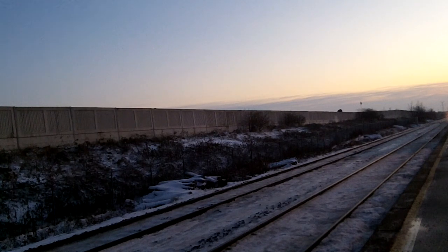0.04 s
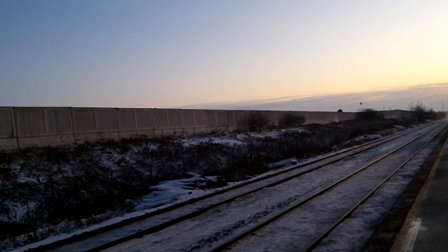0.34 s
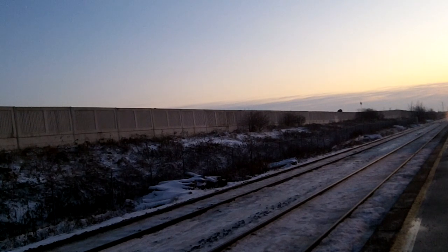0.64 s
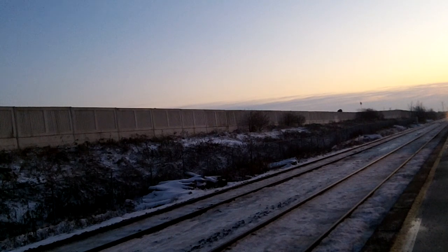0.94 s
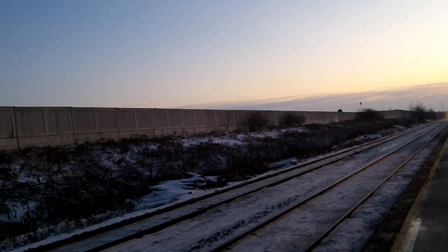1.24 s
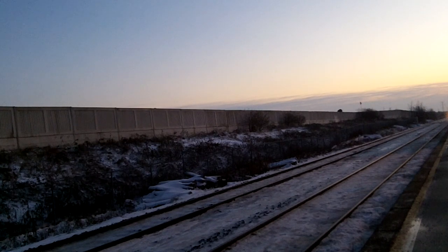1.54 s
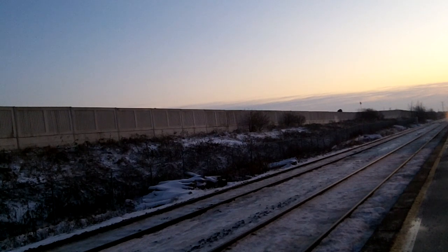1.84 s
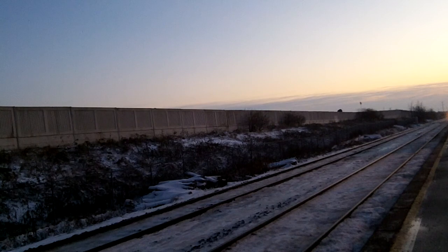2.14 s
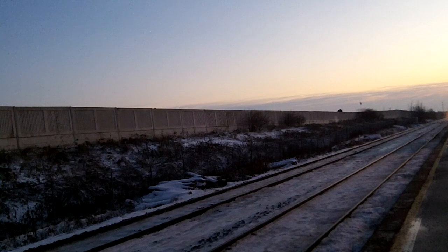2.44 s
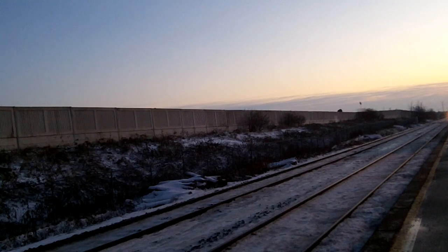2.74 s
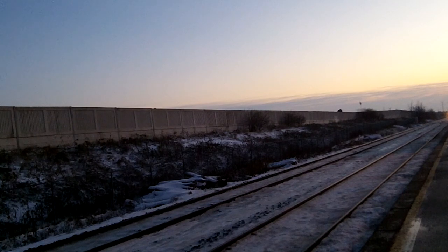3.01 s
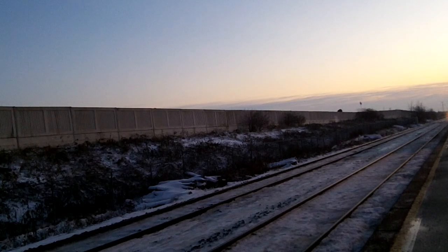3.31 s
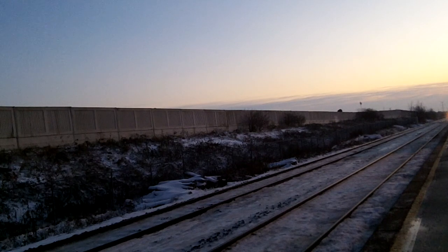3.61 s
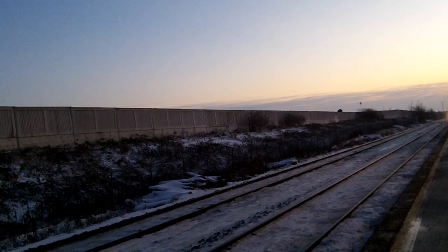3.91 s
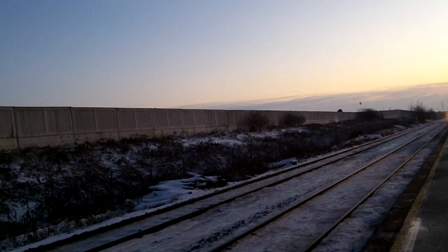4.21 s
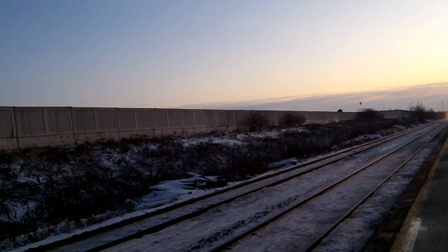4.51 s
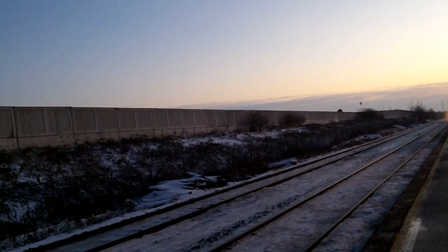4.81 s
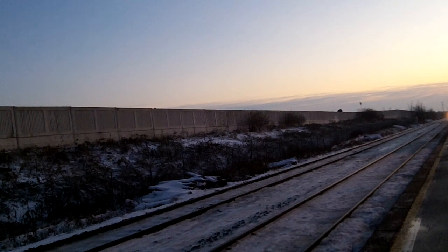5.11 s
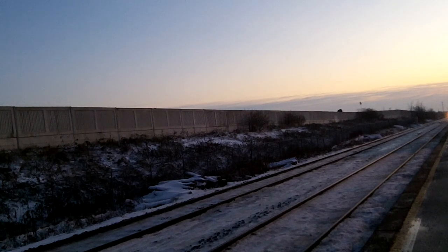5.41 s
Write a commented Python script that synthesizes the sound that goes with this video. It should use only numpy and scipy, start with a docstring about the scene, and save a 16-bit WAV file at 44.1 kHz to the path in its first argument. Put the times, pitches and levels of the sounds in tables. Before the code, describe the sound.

Heard from a station platform, a distant freight train rolls closer behind two hard-working diesel engines. It opens with short metallic scrapes and a fuzzy ringing of wheels on rails, over a low, pulsing drone and an even roar. Soft whines come and go, the deep rumble swells a few times in the second half, and the wheel ringing returns at the close. The overall level stays much the same, with faint microphone hiss underneath.

```python
"""Two diesel locomotives, still far off, haul a freight train under load towards a station platform.
From the start their exhaust pulses beat: at almost equal speeds they drift in and out of step.
In the first second flanges scrape, and wheels and rails sing over the roar of the rolling train.
From about three seconds the deep rumble swells now and then; at the end the wheels sing out again.
Machinery hums and the microphone hisses faintly throughout."""
import sys
import numpy as np
from scipy import signal
from scipy.fft import rfft, irfft
from scipy.io import wavfile
from scipy.ndimage import uniform_filter1d

SR = 44100
rng = np.random.default_rng(int(sys.argv[2]) if len(sys.argv) > 2 else 0)


def put_to_file(sound):
    """Save the sound as 16-bit audio at rate SR, in the file named by the first command-line argument."""
    columns = np.atleast_2d(sound).T  # one column per channel
    safe = np.clip(columns, -1, 1)
    whole_steps = np.round(safe * 32767)
    wavfile.write(sys.argv[1], SR, whole_steps.astype(np.int16))


N = 245195
TIME = np.arange(N) / SR
FROM_MIDDLE_S = TIME - TIME.mean()

# speed of the lead engine: time_s, pulse_rate_hz
LEAD_PULSE_RATE = [(0, 16.065), (5.56, 16.068)]


def engine(speed, first_pulse_s, resonances, growth, chug, scatter, uneven=.09):
    """Periodic pulses form harmonics that ring the silencer; higher ones waver more in the air."""
    rate_hz, = follow(speed, TIME)
    cycles = np.cumsum(rate_hz) / SR - first_pulse_s * rate_hz[0]
    exhaust = np.zeros(N)
    for order in range(3, 14):
        hz = order * rate_hz.mean()
        silencer = sum(amp(db) / (1 + 1j * (hz * hz - peak_hz * peak_hz) / (hz * width_hz)) ** 2
                       for peak_hz, width_hz, db in resonances)
        air = 1 + scatter * order / 14 * waver(2.8)
        nearing = amp(read(growth, hz) * FROM_MIDDLE_S)
        exhaust += np.sqrt(2) * nearing * (silencer * air * np.exp(2j * np.pi * order * cycles)).real
    return exhaust * (1 + uneven * waver(3.5).real) * (1 + chug * np.cos(2 * np.pi * cycles))


def locomotives():
    """Beats: the harmonics of two engines at almost one speed reinforce and cancel in turn."""
    # speed of the rear engine: time_s, pulse_rate_hz
    rear_pulse_rate = [(0, 15.938), (2.8, 15.939), (4.2, 15.965), (5.56, 15.924)]
    # exhaust resonances: pitch_hz, width_hz, level_db
    lead_modes = [(76.5, 7.1, -36.2), (107.5, 10.7, -24.5), (119.4, 11.3, -24.7), (160.4, 3, -40.8),
                  (187.7, 39.6, -49.4), (213.5, 3.5, -30.4)]
    rear_modes = [(96.7, 3, -40.9), (108, 39.8, -41.3), (143.9, 3, -48.9), (161.8, 3, -42.3)]
    # the lead sharpens as it nears; the rear, screened by it, hardly changes: pitch_hz, gain_db_per_s
    lead_growth = [(80, -1), (96, .7), (112, -.3), (128, .6), (145, 2.3), (160, 1.3), (190, .8), (209, 1.4)]
    rear_growth = [(96, -.2), (112, .6)]
    # the lead exhaust as the air carries it: time_s, gain_db, chug_depth
    lead_throb = [(0, .3, .1), (.3, -1.3, .1), (.8, -1.3, 0), (1.25, 1, .1), (1.55, .2, .05), (2.2, -.6, 0),
                  (2.75, -.5, .15), (3.05, 1.3, .2), (3.35, -.3, .05), (3.6, .7, .36), (4.15, .4, .36),
                  (4.52, -.3, .25), (4.68, 1.6, .25), (4.84, -2.2, .05), (4.97, 0, .1), (5.22, .6, .22),
                  (5.38, -1.5, .15), (5.56, -1, .05)]
    fading_db, chug = follow(lead_throb, TIME)
    lead = engine(LEAD_PULSE_RATE, .0561, lead_modes, lead_growth, chug, scatter=.13)
    rear = engine(rear_pulse_rate, .0011, rear_modes, rear_growth, chug=0, scatter=.1)
    return amp(fading_db) * lead + rear


def machinery(approach_db_per_s=1, whine_width_hz=14):
    """Rotation makes spectral lines: engine hums, broadened by echoes, and whines that swell."""
    # lead engine overtones: pulse_rate_multiple, width_hz, steady_share, level_db
    overtones = [(4.04, 4.6, 0.44, -56.5), (15.02, 5.7, 0.28, -57), (18.09, 1.1, 0.3, -56),
                 (19.91, 33, 0.04, -53.5), (24.87, 8.4, 0.08, -56.5), (25.88, 9, 0, -56.5),
                 (27.25, 11, 0.08, -59)]
    # swells of machinery whine, engine overtones near 320 and 400 Hz, higher whines near 550 and 630 Hz:
    # time_s, half_length_s, pitch_hz, steady_share, level_db
    whine_swells = [(0.1, 1, 631.5, .7, -49.5), (1.56, 0.49, 623, 0.9, -53), (3.6, 0.58, 639, 0.4, -50),
                    (5.35, 0.53, 632.5, 0.62, -47.5), (1.9, 0.47, 551, 0.5, -52),
                    (3.95, 0.71, 554, 0.83, -49), (3.95, 0.56, 319.6, .6, -51.5),
                    (5.4, 0.42, 320, 0.57, -49), (0.15, 0.56, 402.6, 0.5, -51.5),
                    (3.446, .15, 400.5, 0.6, -46), (3.9, 0.17, 399.6, 0.43, -48.5),
                    (4.503, 0.13, 405, 0.6, -49.5), (4.96, 0.15, 398, 0.4, -51),
                    (5.464, 0.17, 406, .35, -49)]
    rate_hz = follow(LEAD_PULSE_RATE, TIME)[0].mean()
    hums = sum(amp(db) * tone(k * rate_hz, width, steady) for k, width, steady, db in overtones)
    whines = sum(amp(db) * swell(TIME, s, half_s) * tone(hz, whine_width_hz, steady)
                 for s, half_s, hz, steady, db in whine_swells)
    return hums * amp(approach_db_per_s * FROM_MIDDLE_S) + whines


def exhaust_rumble(gas_db=-41.5, gas_db_per_s=-0.05):
    """Turbulence in the exhaust gas radiates deep noise, which swells now and then."""
    # swells of the rumble: time_s, half_length_s, pitch_hz, width_hz, level_db
    deep_swells = [(3.25, 0.28, 77.8, 36, -42), (4.66, .16, 79.7, 50, -37), (5, 0.089, 79.3, 27.78, -42)]
    # spectrum of the rushing gas: pitch_hz, relative_db
    gas_spectrum = [(10, -21), (25, -3), (45, -15.5), (65, -2.5), (95, -0.5), (155, -3.5), (172, -5),
                    (260, -17), (500, -47.5)]
    booms = sum(amp(db) * swell(TIME, s, half_s) * tone(hz, width, steady=0)
                for s, half_s, hz, width, db in deep_swells)
    return booms + noise(gas_spectrum) * amp(gas_db + gas_db_per_s * FROM_MIDDLE_S)


def rolling(body_db=-39, bright_db=-38.5, patchy_db=1.14, ringing_db=2.0):
    """Rolling contact radiates broadband noise; it brightens as it nears and surges as flanges scrape."""
    # spectrum of the roar: pitch_hz, relative_db
    roar_spectrum = [(100, -13), (230, -3.5), (440, -1.5), (500, -0.5), (680, -0.5), (830, 2), (1050, -1.5),
                     (1300, -5), (1750, -6.5), (1900, -8.5), (2350, -12.5), (2750, -19.5), (3200, -26.5),
                     (4000, -37.5), (6000, -59)]
    # the air absorbs less treble as the path shortens: pitch_hz, gain_db_per_s
    treble_growth = [(2200, 0), (3400, 1.17), (6000, 1)]
    # flanges scraping the rail: time_s, half_length_s, surge_db
    scrapes = [(0.353, 0.1, 4.5), (.59, 0.12, 3), (0.945, 0.1, 2), (3.55, 0.16, 2), (4.153, 0.15, 0.5),
               (5.08, 0.2, 0.5), (5.502, 0.11, 2)]
    # scaling of a surge across the spectrum: pitch_hz, weight
    scrape_weights = [(300, 0.69), (700, 0.23), (1400, 0.68), (2200, 1.3), (3300, 0.92), (6000, 0.87)]
    hz, t, spectra = signal.stft(rng.standard_normal(N), SR, nperseg=1024, noverlap=768)
    hz = hz[:, None]
    colour = evened(amp(read(roar_spectrum, hz)))
    treble = read([(900, 0.043), (2000, 0.45)], hz)  # share of the bright part
    level_db = (1 - treble) * (body_db + 0.0147 * t) + treble * (bright_db - 0.01 * t)
    level_db += read(treble_growth, hz) * t
    level_db += read(scrape_weights, hz) * sum(db * swell(t, s, half_s) for s, half_s, db in scrapes)
    dip_hz = 900 - 81 * t  # the ground echo interferes in a band that sinks as the train nears
    level_db -= 1.5 * swell(hz, dip_hz, half_width=76)
    level_db += patchy_db * patches(spectra.shape, frames=24)
    level_db += ringing_db * treble * patches(spectra.shape, frames=70)  # many fainter wheels
    return signal.istft(spectra * colour * amp(level_db), SR, nperseg=1024, noverlap=768)[1][:N]


def singing():
    """Friction excites wheel and rail resonances into fuzzy rings that swell and may glide."""
    # rings: time_s, half_length_s, pitch_hz, glide_hz_per_s, width_hz, level_db
    rings = [(0.144, 0.27, 773, 0, 120, -43.5), (0.12, 0.28, 2560, 0, 170, -52),
             (.3, 0.42, 1972, 0, 200, -51.5), (.37, 0.11, 2950, 0, 180, -60.5),
             (.38, .13, 1520, 0, 260, -48), (.45, .2, 3280, 0, 300, -65), (.52, .17, 2250, 0, 600, -53),
             (1.25, 0.4, 745, -25, 60, -47.5), (1.33, .17, 2150, 0, 400, -54),
             (2.25, .35, 820, 0, 60, -49.5), (3.05, 0.55, 835, -10, 85, -46.7), (3.6, .18, 805, 0, 70, -50),
             (4.4, .5, 840, 0, 120, -50), (3.6, .85, 990, 0, 45, -52.5), (3.32, .2, 2790, 200, 280, -57.5),
             (3.44, 0.16, 2990, 300, 190, -60.5), (3.45, .13, 3370, 0, 220, -68),
             (4.1, .3, 3360, 0, 200, -70), (4.1, .15, 4100, 0, 400, -72), (4.3, .4, 2434, 1, 130, -58),
             (4.58, 0.1, 1770, 0, 40, -52), (4.98, .16, 436, 0, 35, -50.5), (5.07, .15, 2440, 0, 160, -58),
             (5.07, .17, 3450, -0.5, 520, -63), (5.4, 0.54, 773, 0.5, 120, -44),
             (5.49, .22, 2210, 400, 260, -45.8), (5.485, .15, 1730, 0.5, 200, -50),
             (5.525, 0.12, 1048, 4, 25, -46.5), (5.523, .1, 3070, 0, 260, -63.5),
             (5.46, .1, 3980, 0, 200, -69)]
    return sum(amp(db) * swell(TIME, s, half_s) * tone(hz + glide * (TIME - s), width, steady=0)
               for s, half_s, hz, glide, width, db in rings)


def tone(hz, width_hz, steady):
    """Random modulation broadens a spectral line of rms 1; a steady share stays pure."""
    envelope = steady + (1 - steady) * waver(width_hz / 2)
    cycles = np.cumsum(hz * np.ones(N)) / SR
    return evened((envelope * np.exp(2j * np.pi * cycles)).real)


def waver(corner_hz, size=8192):
    """Complex low-pass noise: a random modulation of rms about 1."""
    hz = np.fft.fftfreq(size, TIME[-1] / size)
    white = rng.standard_normal(size) + 1j * rng.standard_normal(size)
    slow = np.fft.ifft(white / (1 + (hz / corner_hz) ** 2))
    return np.interp(TIME, np.linspace(0, TIME[-1], size), evened(slow))


def patches(shape, frames):
    """Moving averages smooth noise into patches of rms 1 over pitch and time."""
    bands = uniform_filter1d(rng.standard_normal(shape), size=3, axis=0)
    return evened(uniform_filter1d(bands, size=frames, axis=1))


def noise(spectrum):
    """White noise filtered to a spectrum, at rms 1."""
    gain = amp(read(spectrum, np.fft.rfftfreq(N, 1 / SR)))
    return evened(irfft(rfft(rng.standard_normal(N)) * gain, N))


def swell(x, centre, half_width):
    """A Gaussian bell of height 1, in time or in pitch."""
    return np.exp(-((x - centre) / half_width) ** 2)


def read(points, hz):
    """Interpolates a spectrum on a log-frequency axis."""
    point_hz, value = np.transpose(points)
    return np.interp(np.log(hz + 1), np.log(point_hz + 1), value)


def follow(rows, t):
    """Interpolates each column of a curve table at the times t."""
    time_s, *columns = np.transpose(rows)
    return [np.interp(t, time_s, column) for column in columns]


def amp(db):
    """Decibels to amplitude ratio."""
    return 10 ** (np.asarray(db) / 20)


def evened(x):
    """Normalises to rms 1."""
    return x / np.sqrt(np.mean(abs(x) ** 2) + 1e-20)


def scene():
    """Superposition: the pressures of both locomotives and their train add in one channel."""
    return (locomotives() + machinery() + exhaust_rumble() + rolling() + singing())[None]


def record(dry, hiss_db=-63.5, notch_hz=7900, notch_width_hz=600, cutoff_hz=15050):
    """Microphone self-noise joins the sound; a treble notch and a low-pass then filter both."""
    # microphone hiss: pitch_hz, relative_db
    hiss_spectrum = [(100, -4), (4000, 6.5), (6500, 0.5), (9000, -5), (11000, 1.5), (14000, 0), (15000, -5)]
    notch = 1 - swell(np.fft.rfftfreq(N, 1 / SR), notch_hz, notch_width_hz)
    sound = irfft(rfft(dry + amp(hiss_db) * noise(hiss_spectrum)) * notch, N)
    low_pass = signal.firwin(511, cutoff_hz, window=("kaiser", 9), fs=SR)
    return signal.oaconvolve(sound, low_pass[None], "same")


dry = scene()
out = record(dry)
put_to_file(out)
```